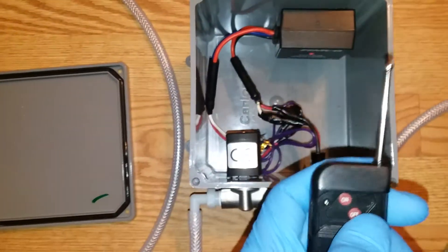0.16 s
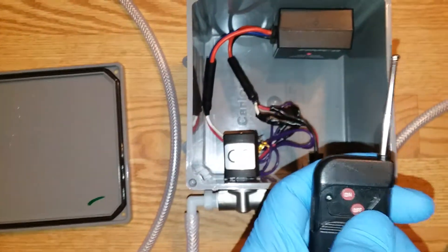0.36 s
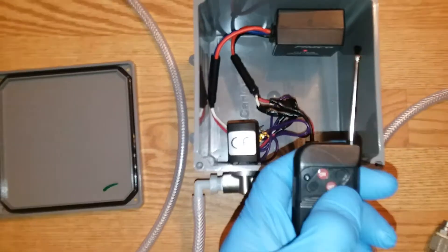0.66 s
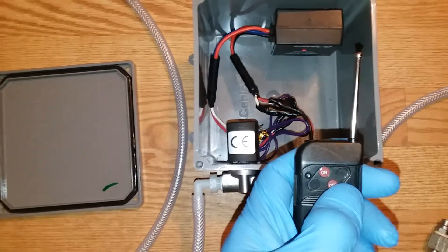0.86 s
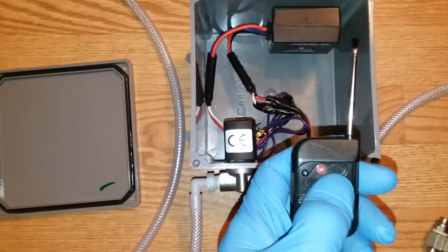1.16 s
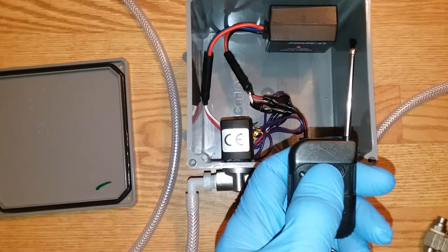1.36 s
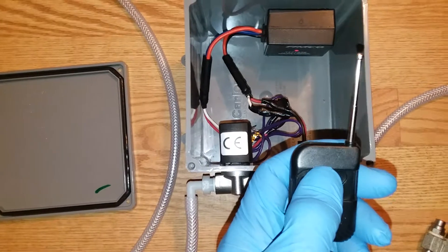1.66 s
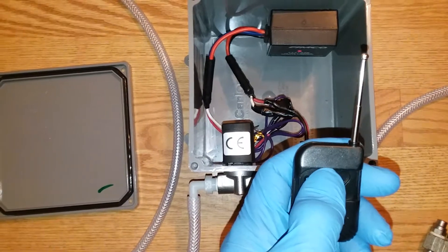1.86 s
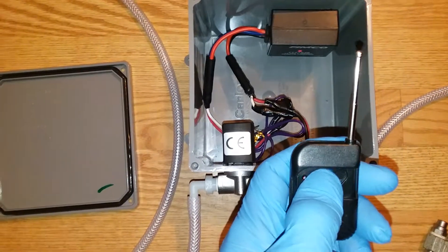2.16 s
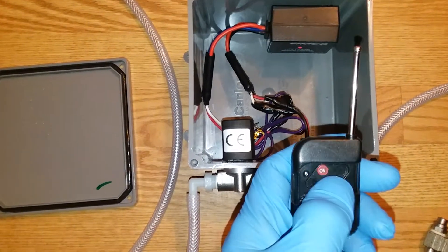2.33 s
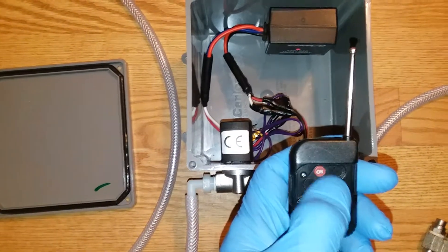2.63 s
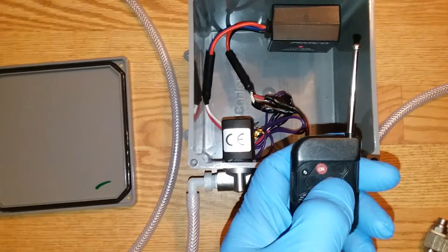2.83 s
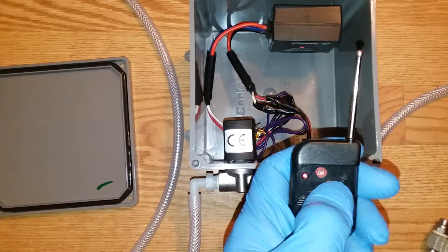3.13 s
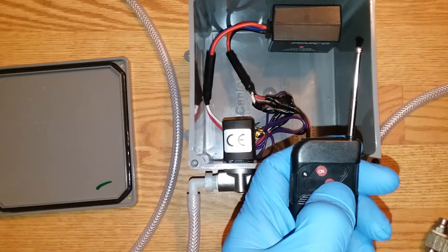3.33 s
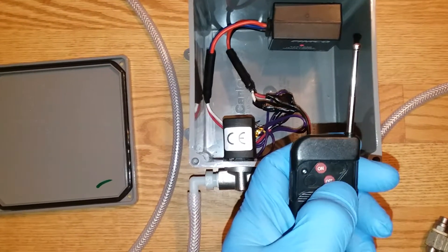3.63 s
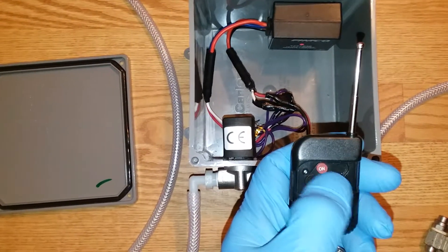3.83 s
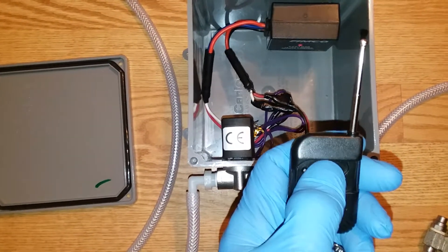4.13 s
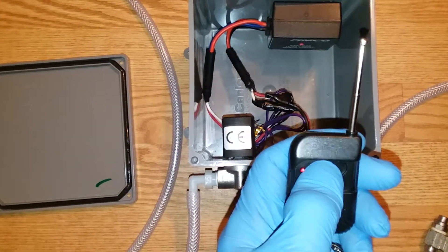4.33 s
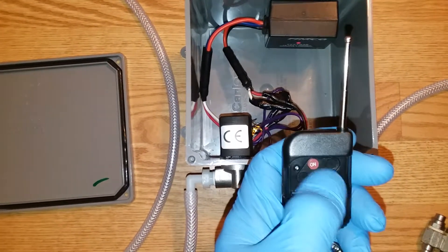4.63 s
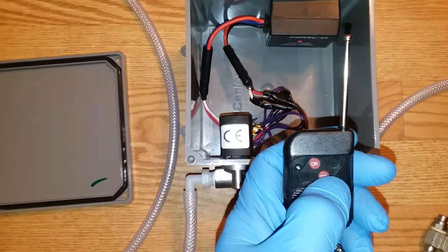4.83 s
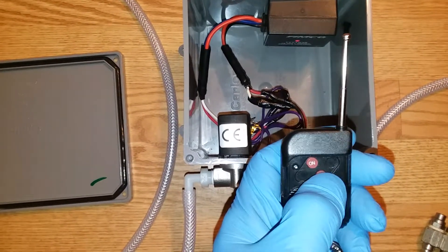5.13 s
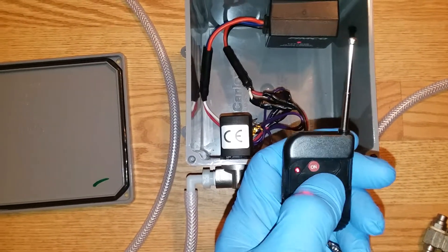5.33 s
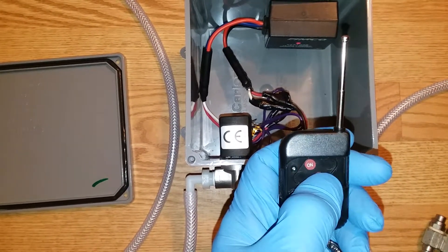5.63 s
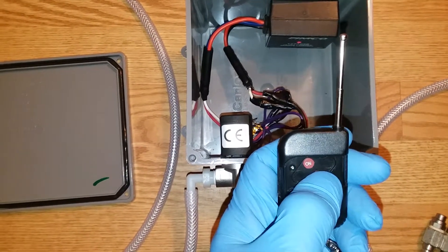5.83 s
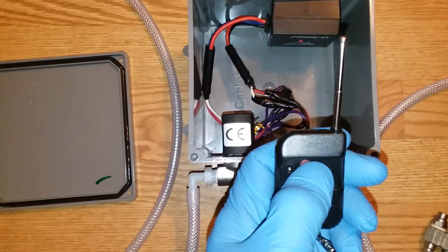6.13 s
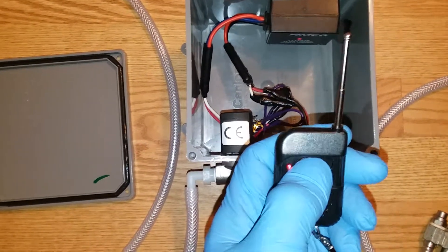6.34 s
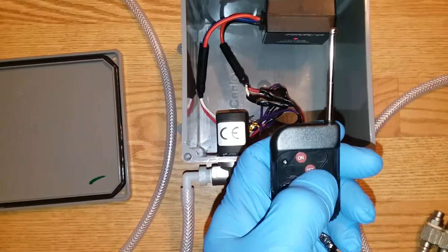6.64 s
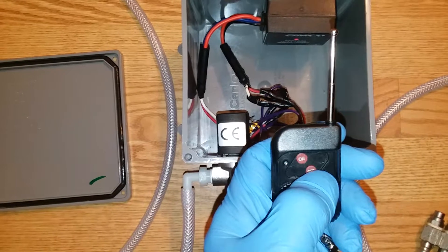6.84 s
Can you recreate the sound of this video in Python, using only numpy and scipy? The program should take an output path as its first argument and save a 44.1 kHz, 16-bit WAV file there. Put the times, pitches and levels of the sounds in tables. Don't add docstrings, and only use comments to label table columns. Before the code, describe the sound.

Close phone microphone above a wooden bench, short room reverberation. First only hum, hiss and barely audible rubber creeping on plastic, then one press and release of a button. Later presses trigger the valve: a modest double click closing, a much louder bright slam opening with a rush of air and box ring, a softer closing, and another loud opening. Button releases sound duller than presses.

```python
import sys
import numpy as np
from scipy import signal
from scipy.fft import rfft, irfft, next_fast_len
from scipy.io import wavfile
from scipy.ndimage import map_coordinates

SR = 44100
rng = np.random.default_rng(int(sys.argv[2]) if len(sys.argv) > 2 else 0)


def to_wav(sig):
    pcm = np.clip(np.atleast_2d(sig), -1, 1) * 32767
    pcm = np.round(pcm).astype(np.int16)
    wavfile.write(sys.argv[1], SR, pcm.T)


def linear_from_db(decibels):
    return 10 ** (np.asarray(decibels, float) / 20)


N = 307773

# (time [s], peak [dB], lasting ring [dB], left-right [dB])
PLUNGER_OPEN = [
    (4.4223, -11, -8.5, -1),
    (6.3378, -10.5, -9.5, -1.7),
]
# (frequency [Hz], level [dB], t60 [s])
BOX_OPEN_MODES = [(1009, -15.5, 0.18), (1311, -0.5, .2), (1480, -1.5, .15), (1907, -0.5, 0.12),
                  (2488, -0.5, 0.13), (3640, -1.5, 0.034), (4810, -5, 0.25), (12080, -7, .15),
                  (12830, -1, .15)]


def unit(x):
    return x / np.sqrt(np.mean(x ** 2) + 1e-20)


def along(points, hz):
    f, v = np.transpose(points)
    return np.interp(np.log(hz + 1), np.log(f + 1), v)


def sides(pan_db):
    return linear_from_db([[pan_db / 2], [-pan_db / 2]])


def wobble(rate):
    knots = rng.standard_normal(int(N * rate / SR) + 4)
    return map_coordinates(knots, [np.arange(N) * rate / SR])


def noise(spectrum, size, lean=((1, 0),), alike=((1, 0),)):
    m = next_fast_len(size)
    hz = np.fft.rfftfreq(m, 1 / SR)
    turn = np.arccos(np.clip(along(alike, hz), -1, 1)) / 2
    colour = linear_from_db(along(spectrum, hz))
    middle, side = rfft(rng.standard_normal((2, m))) * colour * [np.cos(turn), np.sin(turn)]
    half = linear_from_db(along(lean, hz) / 2)
    return unit(irfft([(middle + side) * half, (middle - side) / half], m)[:, :size])


def add(track, sound, s):
    i = round(s * SR)
    track[:, i:i + sound.shape[1]] += sound[:, :N - i]


def fade(t, rise, t60):
    return (1 - np.exp(-t / rise)) * linear_from_db(-60 * t / t60)


def room(sound, wet_db, gap):
    # (frequency [Hz], t60 [s])
    decay = [(300, .25), (1500, .38), (3200, 0.33), (4900, .36), (6500, 0.37), (12000, 0.27)]
    hz, t, z = signal.stft(rng.standard_normal((2, SR // 2)), SR, nperseg=256)
    dying = linear_from_db(-60 * t / along(decay, hz)[:, None])
    tail = signal.istft(z * dying, SR, nperseg=256)[1]
    tail = tail * (1 - np.exp(-(np.arange(tail.shape[1]) / SR / gap) ** 2))
    tail = tail / np.linalg.norm(tail[0])
    wet = signal.fftconvolve(sound.mean(axis=0)[None], tail, axes=1) * linear_from_db(wet_db)
    return wet + np.pad(sound, ((0, 0), (0, tail.shape[1] - 1)))


def background():
    # (frequency [Hz], density [dB per Hz])
    rumble_tone = [(12, -58), (20, -32), (42, -8.5), (119, -2), (147, -10.5), (237, -14.5), (264, -18.5),
                   (293, -13.5), (318, -25), (354, -13), (384, -23), (1780, -35), (3000, -45.5),
                   (3900, -69.5), (6600, -120)]
    # (frequency [Hz], left-right likeness [0-1])
    likeness = [(60, 0.93), (130, 0.67), (290, .62), (640, .38), (1400, 0.079)]
    # (frequency [Hz], density [dB per Hz])
    hiss_tone = [(590, -33), (1000, -7.5), (1530, -6.5), (2000, -4), (2300, -9.5), (2840, -7.5),
                 (4090, -10.5), (6610, -9), (8360, -3), (12500, -8), (13800, 0), (15900, -9),
                 (16500, -26.5)]
    # (frequency [Hz], left-right [dB])
    hiss_lean = [(60, 2), (110, -2), (200, -1.5), (380, -4), (700, -2.5), (1290, -2.5), (2380, 0),
                 (4400, 1), (8120, 15.5), (15000, 14)]
    orders = [1, 2, 4, 5, 6, 9, 10, 12]
    order_db = [-72.5, -61.5, -73, -76, -83, -90, -85, -87.5]
    motor_hz, rumble_db, hiss_db = 59.2, -60, -73
    sag_db, sag_s, hold_s, recover_s = -3, 0.15, 0.73, 0.12

    t = np.arange(N) / SR
    steps = np.cumsum([0, sag_s, hold_s, recover_s])
    gain_db = sum(np.interp(t, s + steps, [0, sag_db, sag_db, 0]) for s, *_ in PLUNGER_OPEN)
    rumble = linear_from_db(-1.5 + 0.77 * wobble(4.7)) * noise(rumble_tone, size=N, alike=likeness)
    turn = 2 * np.pi * motor_hz * t + 0.18 * wobble(2.7)
    hum = np.zeros(N)
    for k, line_db in zip(orders, order_db):
        hum += linear_from_db(line_db + 0.76 * wobble(3.8)) * np.sin(k * turn + 7 * rng.random())
    hiss = linear_from_db(4.0) * noise(hiss_tone, size=N, lean=hiss_lean)
    return linear_from_db(rumble_db + gain_db) * (rumble + linear_from_db(58.5) * hum) + linear_from_db(hiss_db + gain_db) * hiss


def glove():
    # (time [s], length [s], level [dB], mode [Hz])
    strokes = [(0.0, 0.26, -81.5, 1840), (0.858, .13, -79, 1350), (1.089, 0.086, -75, 1710),
               (1.2, 0.054, -80, 1170), (2.261, 0.033, -57, 1530), (3.387, .04, -73, 1610),
               (4.307, 0.018, -65, 1620), (2.611, 0.074, -77.5, 1660), (2.713, 0.16, -73.5, 1706),
               (2.72, .08, -81, 1450), (2.872, 0.038, -83, 1660), (5.05, 0.17, -83, 1410),
               (5.059, 0.048, -82.5, 1740), (5.261, 0.012, -76, 2200), (6.043, 0.048, -66.5, 1670),
               (6.098, 0.037, -78, 1750)]
    width = 0.16

    def hump(centre, top_db):
        return [(centre * (1 - width), -30), (centre, top_db), (centre * (1 + width), -30)]

    out = np.zeros((2, N))
    for s, length, db, hz in strokes:
        tone = [(hz / 2, -60), *hump(hz, 0), *hump(hz * 1.31, -12), (hz * 2, -60)]
        size = round(length * SR)
        swell = signal.windows.tukey(size, 0.53)
        add(out, linear_from_db(db) * swell * noise(tone, size=size, alike=[(1, 0.32)]), s)
    return out * linear_from_db(2.6 * wobble(55)) * sides(-9.5)


def button(events, tick_tone, tick_t60, tick_pan_db, wet_db, pitch, spread_hz, soft):
    # (frequency [Hz], left [dB], right [dB], t60 [s])
    case_modes = [(1512, -21, -17, .012), (1800, -16, -3.5, .011), (2173, -8, 2, 0.01),
                  (2440, -22.5, -19.5, .01)]
    out, t = np.zeros((2, N)), np.arange(SR // 20) / SR
    shell = signal.cheby1(3, 0.5, [1300, 2480], "band", fs=SR, output="sos")
    for s, db, tick_db, favoured_hz in events:
        ring = np.zeros((2, len(t)))
        for hz, left, right, t60 in case_modes:
            favour = linear_from_db(rng.normal(0, 1) - ((hz - favoured_hz) / spread_hz) ** 2)
            tone = fade(t, 0.00038 * soft, t60 * soft) * np.sin(2 * np.pi * hz * pitch * t)
            ring += linear_from_db([[left], [right]]) * favour * tone
        tick = noise(tick_tone, size=len(t), alike=[(1, 0.5)])
        tick = tick * fade(t, 0.0002, tick_t60) * sides(tick_pan_db)
        snap = linear_from_db(7.0) * signal.sosfilt(shell, ring) + linear_from_db(tick_db + 13.5) * tick
        add(out, room(linear_from_db(db) * snap, wet_db, 0.0029), s)
    return out


def remote():
    # (time [s], peak [dB], tick [dB], favoured mode [Hz])
    press = [(1.92, -18.5, -20, 1950), (3.0362, -15.5, -18.5, 1943), (4.346, -15.5, -19, 1950),
             (5.3091, -18, -15.5, 1950), (6.261, -18, -17.5, 1956)]
    let_go = [(2.135, -13, -31, 1950), (3.1837, -9.5, -27, 1950), (4.5215, -9.5, -28.5, 1950),
              (5.5169, -11.5, -22, 1950), (6.4342, -14, -25.5, 1950)]
    touch = [(1.6257, -39.5, -32, 1680), (2.0507, -41, -41.5, 2110), (2.9208, -35, -25.5, 1950),
             (2.9472, -50.5, -32, 2110), (4.6049, -35.5, -24, 2090)]
    # (frequency [Hz], density [dB per Hz])
    bright_tick = [(1470, -36), (2500, -9), (4210, -11.5), (5130, -17), (8910, -17.5), (10000, -20),
                   (14800, -13), (16500, -26)]
    dull_tick = [(1650, -35), (2800, -3), (5110, -12), (5710, -10.5), (8270, -27), (9250, -26),
                 (15100, -41), (16500, -56)]
    out = button(press, bright_tick, 0.004, 6, -13, pitch=1.01, spread_hz=600, soft=0.87)
    out += button(let_go, dull_tick, 0.007, -1.5, -15.5, pitch=0.97, spread_hz=600, soft=0.76)
    out += button(touch, dull_tick, 0.0076, -4, -7.5, pitch=0.94, spread_hz=190, soft=1.3)
    return out


def contact(events, tone, ring_tone, modes, mode_db, rise, crack_t60, ring_t60, wet_db):
    # (frequency [Hz], left-right [dB])
    box_lean = [(60, -5.0), (150, -4), (380, 0.5), (950, -4.0), (2380, -0.5), (5980, -2), (15000, 2.0)]
    out, t = np.zeros((2, N)), np.arange(SR // 3) / SR
    for s, db, ring_db, pan_db in events:
        crack = noise(tone, size=len(t), lean=box_lean, alike=[(1, 0.2)]) * fade(t, rise, crack_t60)
        ring = noise(ring_tone, size=len(t), lean=box_lean) * fade(t, 0.0093, ring_t60) * linear_from_db(ring_db)
        drift = rng.standard_normal((len(modes), 2, len(t))).cumsum(axis=2) * 0.05
        clear = np.zeros((2, len(t)))
        for (hz, level, t60), blur in zip(modes, drift):
            strength = linear_from_db(level + rng.normal(0, 2.6, (2, 1)))
            phase = 2 * np.pi * (hz * t + rng.random((2, 1))) + blur * (hz / 1800) ** 1.3
            clear += strength * fade(t, 0.0011, t60) * np.sin(phase)
        blow = linear_from_db(db) * (crack + ring + linear_from_db(mode_db) * clear) * sides(pan_db)
        add(out, room(blow, wet_db, 0.007), s)
    return out


def relay():
    # (time [s], peak [dB], lasting ring [dB], left-right [dB])
    lets_go = [
        (3.0987, -17, -15, -1),
        (5.4012, -22, -8, 0.5),
    ]
    pulls_in = [
        (4.414, -12, -18.5, -1.7),
        (6.3292, -12.5, -16, -2.0),
    ]
    # (frequency [Hz], density [dB per Hz])
    off_tone = [(120, -49), (200, -14.5), (485, -7.5), (829, -25.5), (1770, -6.5), (2050, -6), (2650, 0),
                (3430, -13), (5350, -2.5), (6930, -23.5), (7600, -2.5), (15000, -14), (16500, -37)]
    on_tone = [(180, -49), (300, -24), (742, -19), (2030, -3), (3360, -11), (3770, -4.5), (5190, -0.5),
               (6560, -5.5), (8160, 2.5), (9180, -3.5), (16500, -14.5)]
    # (frequency [Hz], level [dB], t60 [s])
    knocked_box = [(435.8, -10.5, .05), (530, -14.5, .08), (1280, -8, 0.065), (1840, -5.5, 0.059),
                   (2560, 1.5, .03), (3960, 0, .02), (5170, 0, .02)]
    out = contact(lets_go, off_tone, off_tone, knocked_box, -6.5, 0.0004, 0.016, 0.029, -16.5)
    out += contact(pulls_in, on_tone, on_tone, BOX_OPEN_MODES, -24, 0.0003, 0.012, 0.038, -9.5)
    return out


def valve():
    # (time [s], peak [dB], lasting ring [dB], left-right [dB])
    drop_shut = [
        (3.1213, -16.5, -19.5, -1.5),
        (5.4235, -20, -23, -4.5),
    ]
    first_slam = [
        (4.4218, -9, -38, 4.5),
        (6.3372, -9, -40.5, 3),
    ]
    rebound = [
        (4.4252, -18.5, -31.5, 2),
        (6.3402, -20, -29.5, 0),
    ]
    # (frequency [Hz], density [dB per Hz])
    shut_tone = [(88, -59.5), (150, -23.5), (386, -18.5), (518, -12), (864, -23.5), (1310, -11),
                 (1690, -11.5), (1820, -8.5), (2650, -14.5), (3770, -12.5), (4510, -14), (15300, -35.5),
                 (16500, -54)]
    open_tone = [(240, -28), (400, -13), (831, -15.5), (2470, 5.5), (3120, -13.5), (3880, 8), (4680, 0),
                 (6590, -17.5), (7230, -2.5), (11000, -15), (12900, -3), (15700, -12), (16500, -26.5)]
    slam_tone = [(880, -31), (1500, -0.5), (4430, -4), (5930, -9.5), (7100, -8), (10700, -6), (12800, 2),
                 (13600, -1), (16500, -15.5)]
    air_tone = [(120, -46), (200, -19), (617, -16.5), (756, -19.5), (979, -7.5), (1130, -14.5), (1500, 1),
                (1640, -7.5), (1830, -4.5), (3310, -8), (4700, -9.5), (6680, -17.5), (12700, -10),
                (15600, -12.5), (16500, -34)]
    # (frequency [Hz], level [dB], t60 [s])
    shut_box = [(445, -7, .06), (493, -6.5, 0.056), (1326, -4.5, .09), (1460, -7, 0.18), (1845, -1, .05),
                (2340, -8.5, .03), (3790, 11.5, 0.014)]
    # (time [s], level [dB], left-right [dB], width [s])
    puffs = [
        (4.4231, -20.5, -23.5, 0.0012),
        (6.3377, -33, -16, 0.0017),
    ]
    out = contact(drop_shut, shut_tone, shut_tone, shut_box, -6.5, 0.001, 0.03, 0.14, -8)
    out += contact(PLUNGER_OPEN, open_tone, air_tone, BOX_OPEN_MODES, -15, 0.00081, 0.032, 0.22, -7)
    out += contact(rebound, open_tone, air_tone, shut_box, -9.5, 0.0004, 0.0098, 0.05, -8)
    out += contact(first_slam, slam_tone, air_tone, BOX_OPEN_MODES, -29.5, 0.00022, 0.017, 0.05, -8.5)
    for s, db, pan_db, width in puffs:
        u = np.arange(SR // 10) / SR / width
        push = u * (2 - u) * np.exp(-u)
        add(out, linear_from_db(db + 6.0) * sides(pan_db) * push, s)
    return out


def scene():
    return background() + glove() + remote() + relay() + valve()


def top_cut(x):
    return signal.sosfilt(signal.butter(12, 17100, fs=SR, output="sos"), x)


def record(dry):
    # (frequency [Hz], gain [dB])
    band_limit = [(15750, 0), (15900, -9), (17000, -12), (17150, -120)]
    m = next_fast_len(N)
    gain = linear_from_db(along(band_limit, np.fft.rfftfreq(m, 1 / SR)))
    mix = irfft(rfft(dry, m) * gain, m)[:, :N]
    return top_cut(mix)


dry = scene()
out = record(dry)
to_wav(out)
```